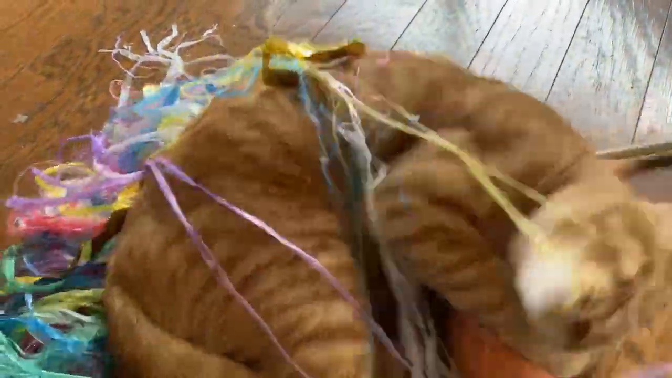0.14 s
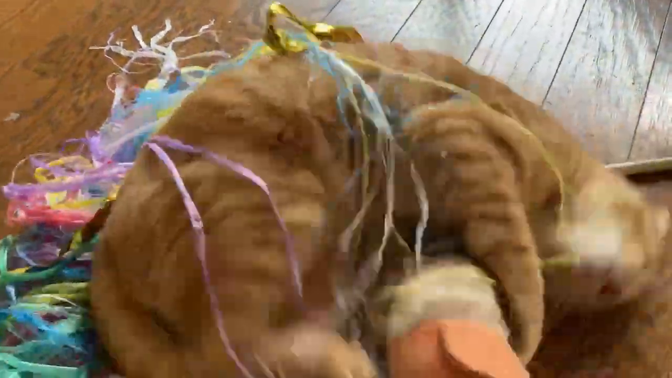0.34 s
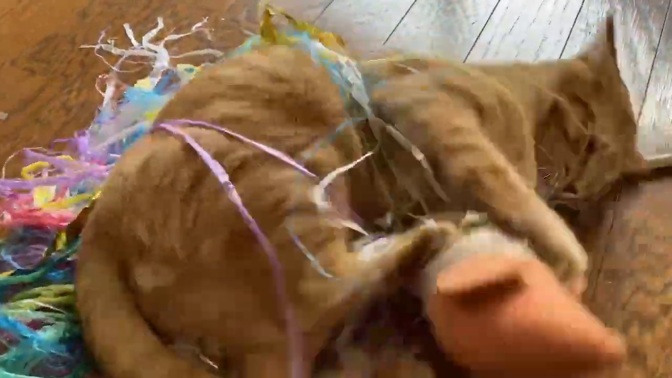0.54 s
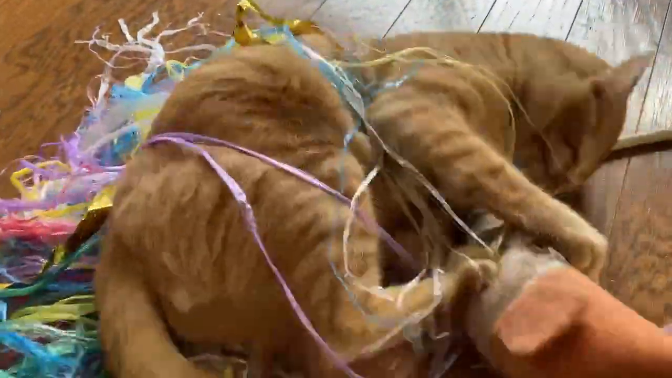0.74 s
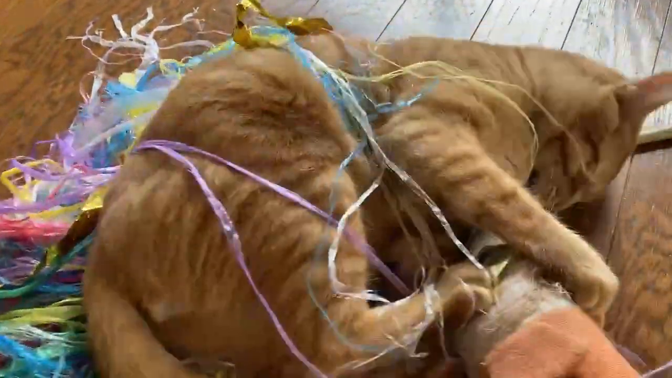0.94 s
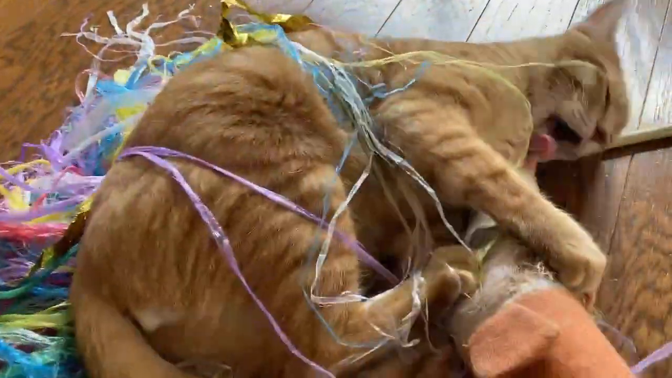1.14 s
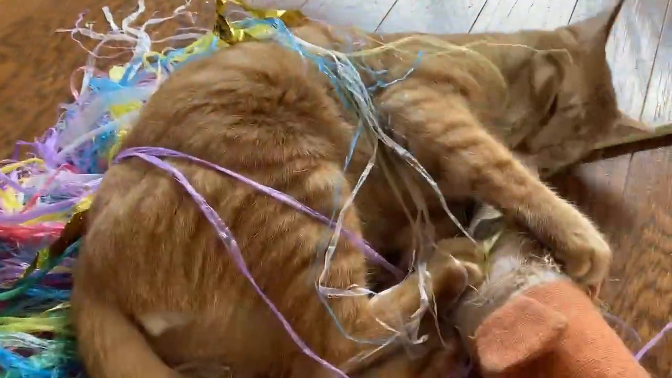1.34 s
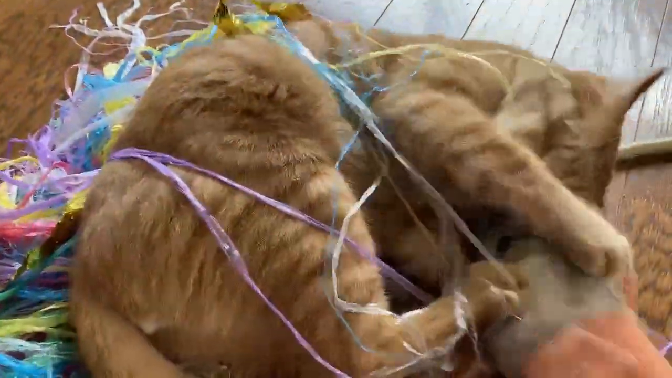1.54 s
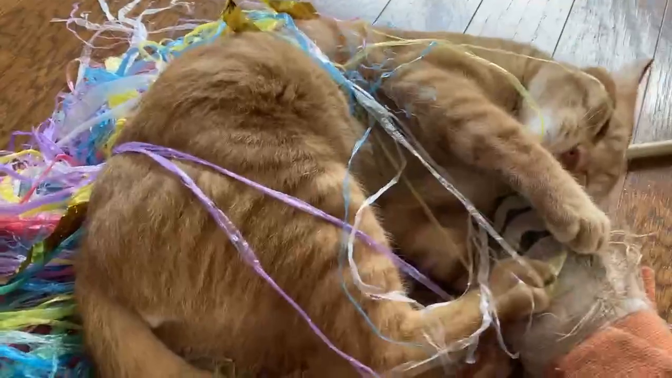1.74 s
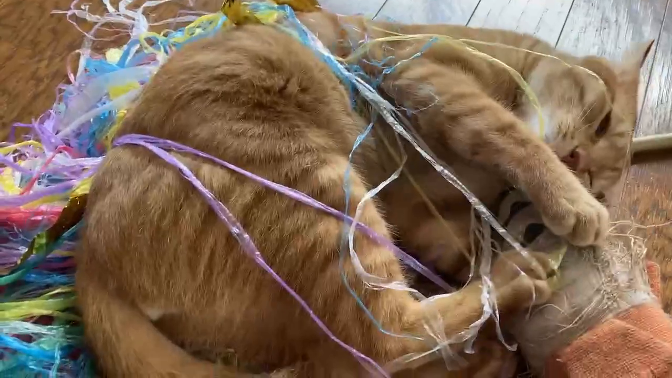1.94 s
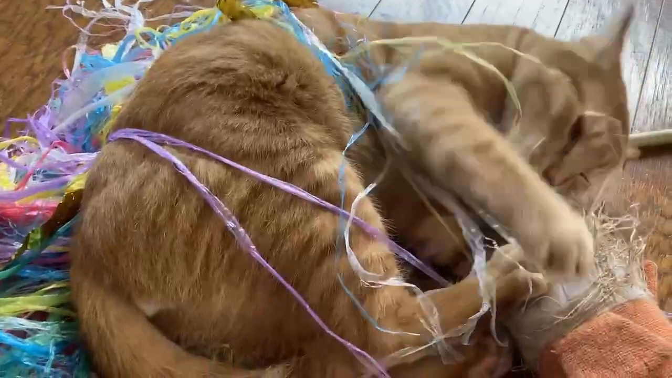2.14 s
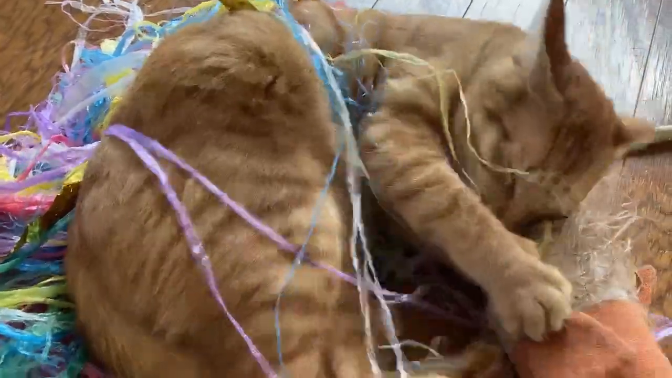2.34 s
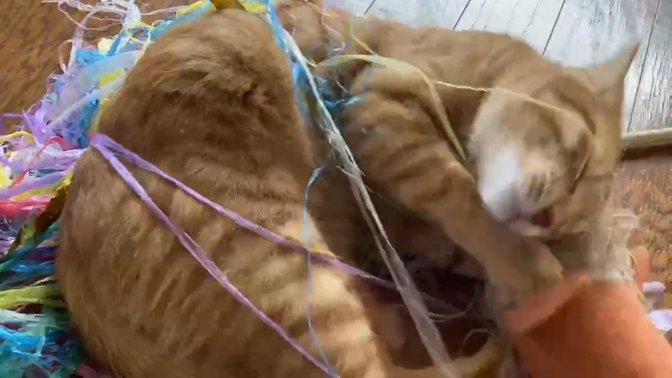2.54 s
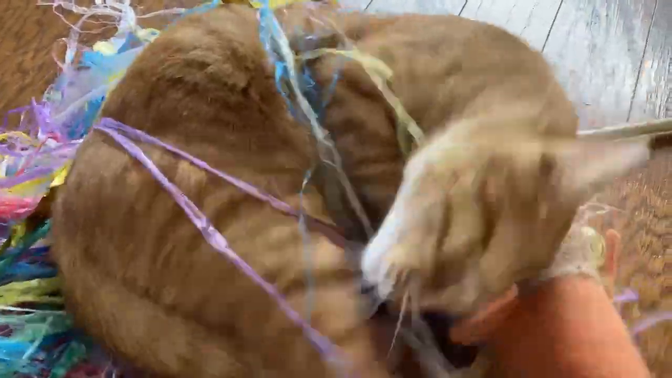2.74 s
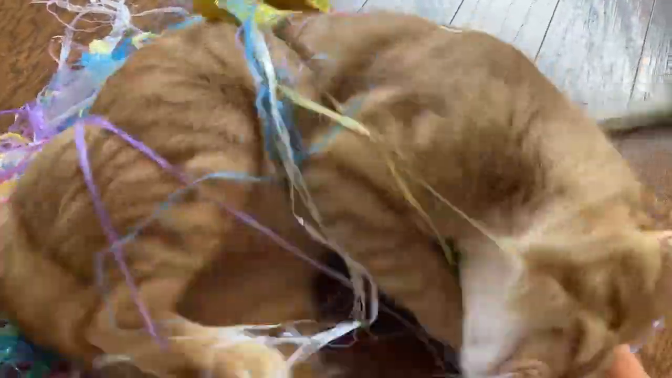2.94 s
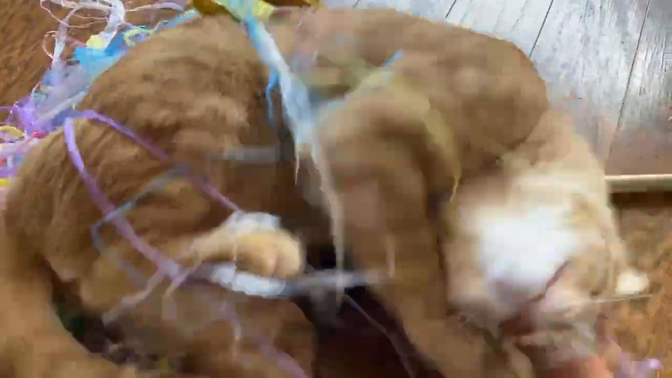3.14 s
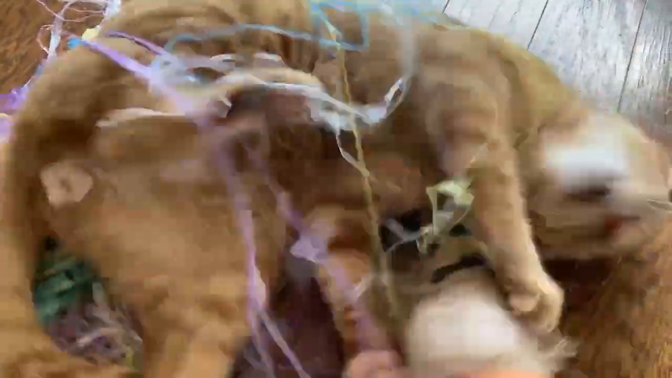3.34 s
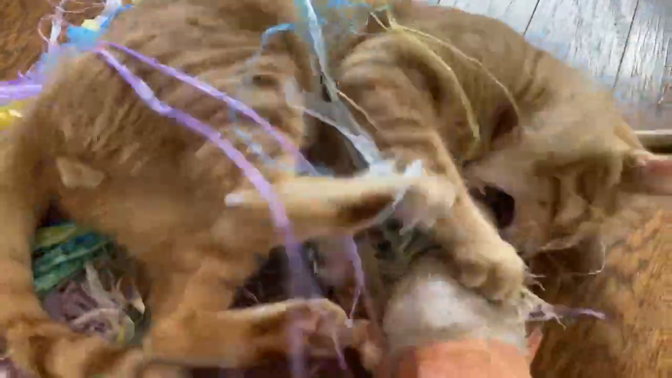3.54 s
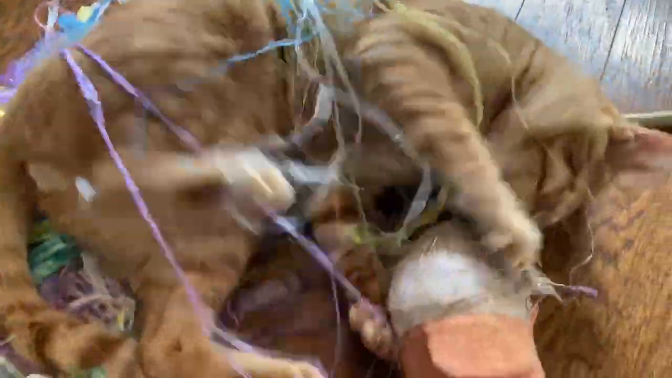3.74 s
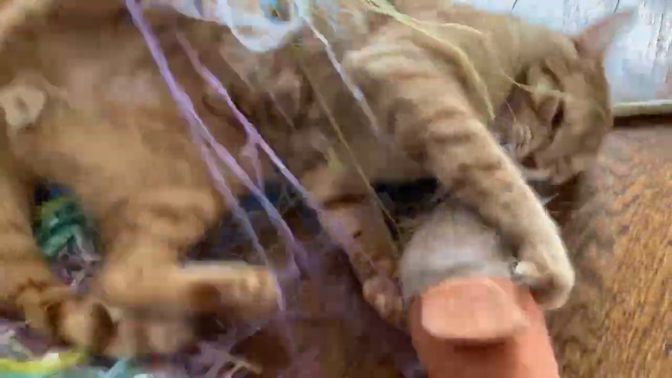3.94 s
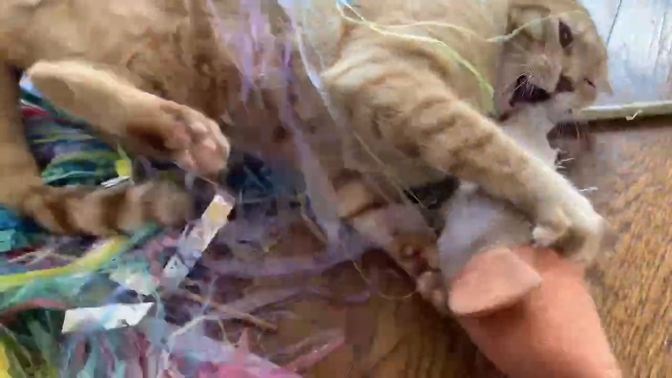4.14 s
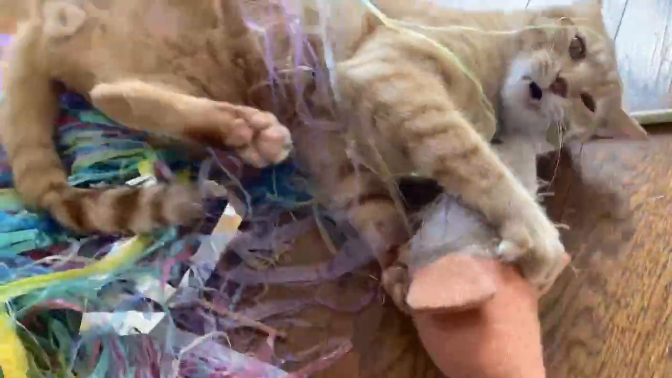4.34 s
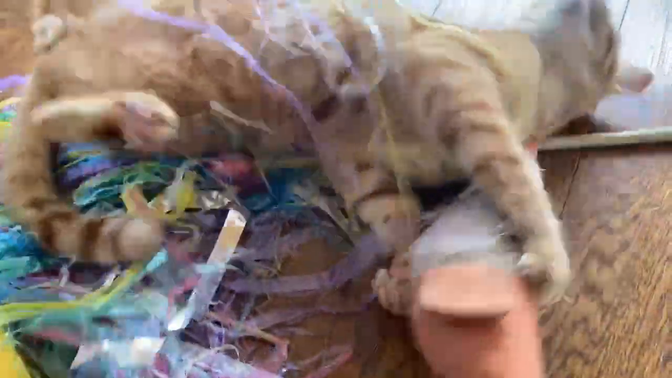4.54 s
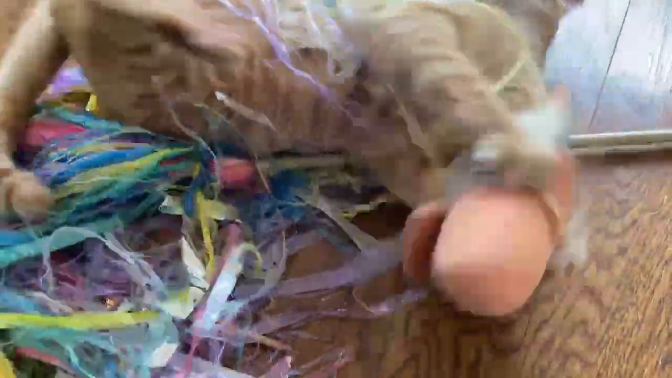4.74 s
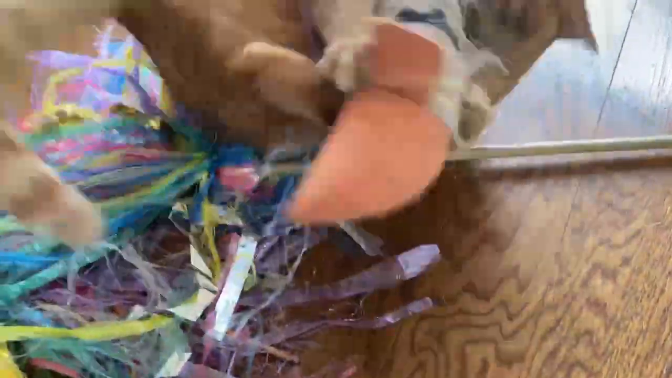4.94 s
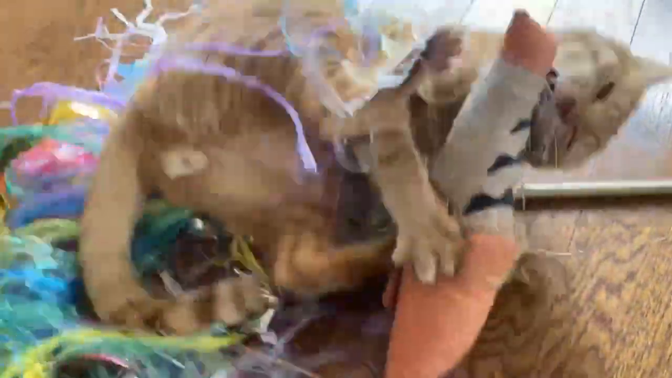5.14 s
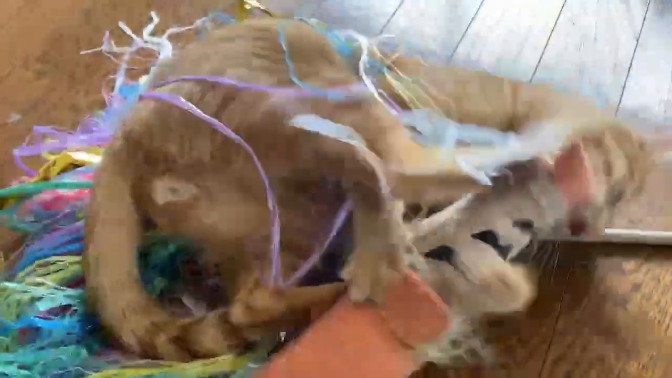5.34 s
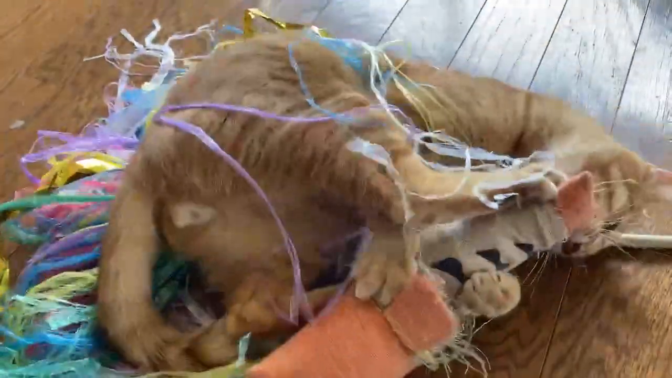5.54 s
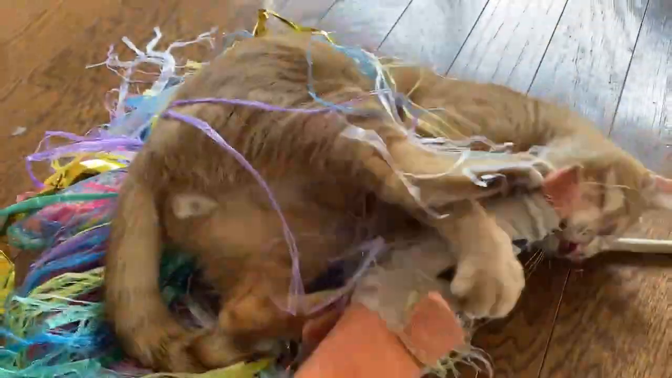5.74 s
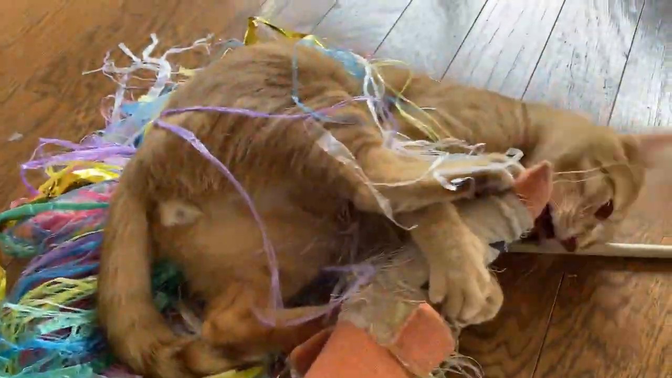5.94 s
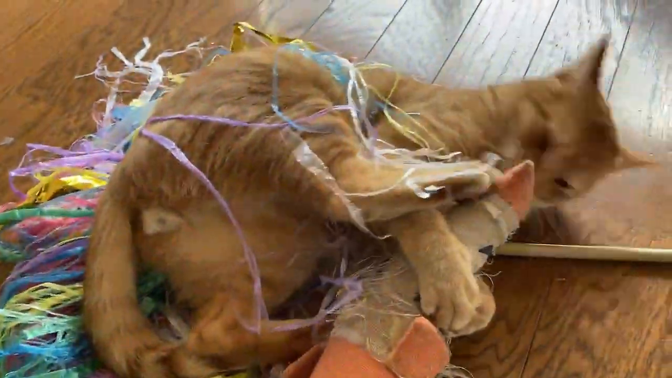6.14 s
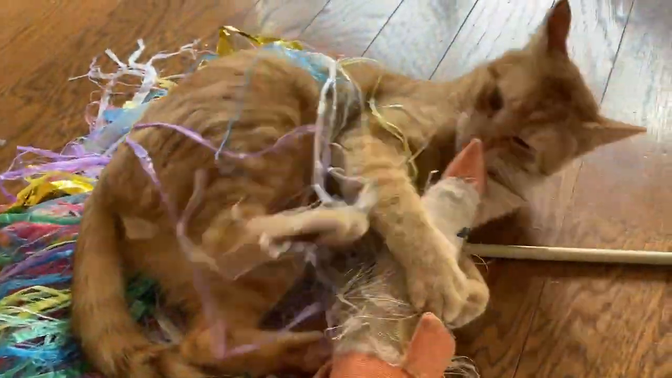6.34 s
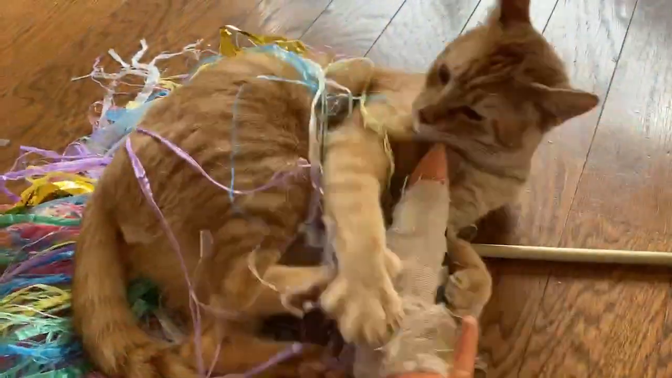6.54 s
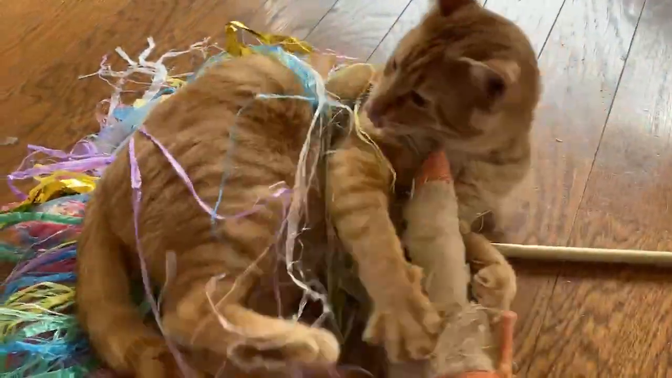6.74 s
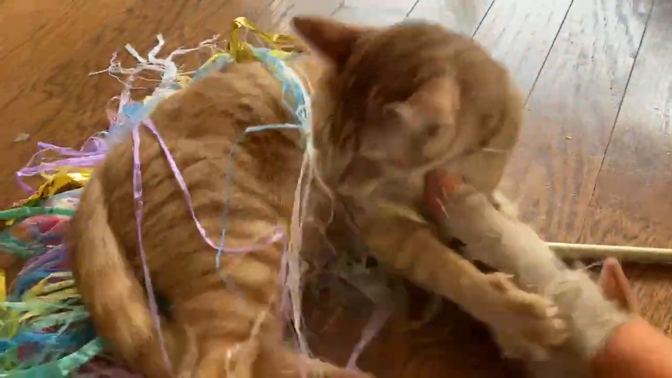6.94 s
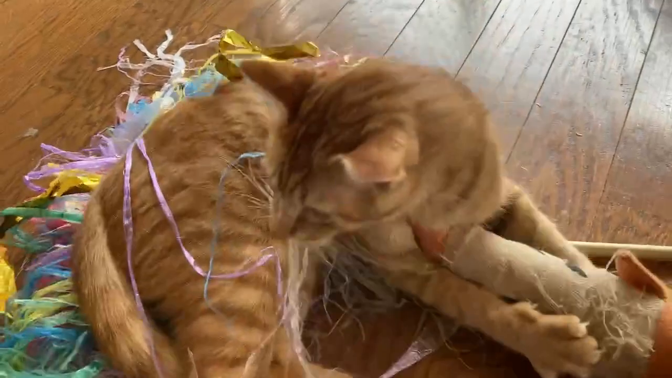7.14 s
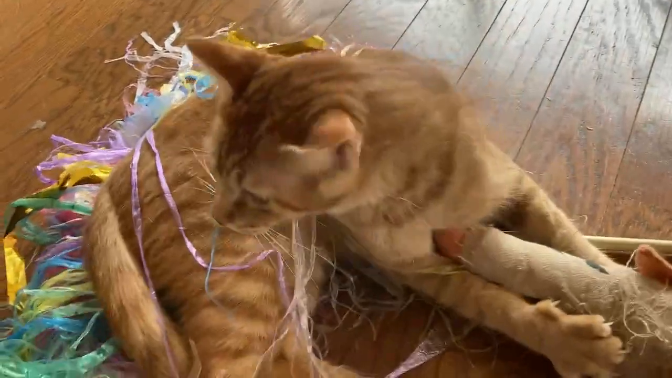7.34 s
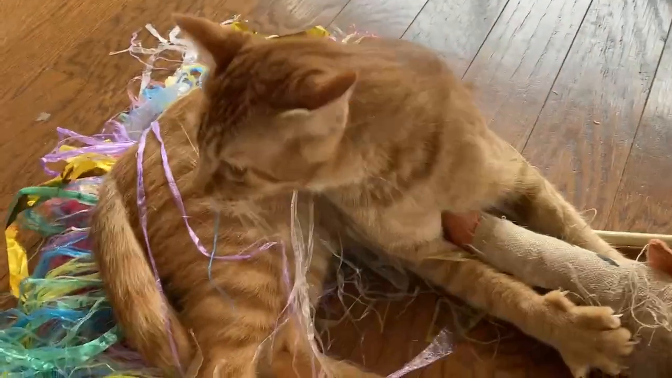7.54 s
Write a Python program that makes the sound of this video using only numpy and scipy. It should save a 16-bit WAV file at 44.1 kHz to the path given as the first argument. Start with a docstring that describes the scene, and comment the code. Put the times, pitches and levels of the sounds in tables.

```python
"""Cat wrestling a toy in plastic ribbon

A cat wrestles a cloth toy in a heap of thin plastic ribbon on a wooden floor, close to a phone.
Clumped clicks make the ribbon crackle, noise bursts its snaps, and banded grains the fur and cloth scuffs.
Decaying modes jingle a small bell, chatter rings a dragged hollow wand, falling waves give knocks and thumps.
A low rumble lies beneath; two microphone ports comb the treble against each other."""
import sys
import numpy as np
from scipy import signal
from scipy.fft import rfft, irfft, next_fast_len
from scipy.io import wavfile
from scipy.ndimage import uniform_filter1d

SR = 44100
rng = np.random.default_rng(int(sys.argv[2]) if len(sys.argv) > 2 else 0)


def digitize_waveform(pressure):
    """Quantize a signal to 16-bit integers and store it at the path in sys.argv[1].

    Rows of a 2-D input are taken as channels; values are limited to [-1, 1].
    """
    field = np.atleast_2d(pressure).T
    bounded = np.clip(field, -1, 1)
    quanta = np.round(bounded * 32767).astype(np.int16)
    wavfile.write(sys.argv[1], SR, quanta)


def makeup_ratio(level_db):
    """Linear amplitude ratio for a level in decibels (20 dB per factor of ten)."""
    decades = np.asarray(level_db, float) / 20
    return 10 ** decades


N = 338688
T = np.arange(N) / SR

# Tugs at the ribbon. Each row: peak time, rise and fall in seconds, level in dB.
RIBBON_TUGS = [(0.075, 0.058, 0.55, -48), (0.24, 0.186, 0.065, -33.5), (0.334, 0.187, 0.157, -43.5),
               (0.63, 0.19, 0.44, -47), (1.098, 0.46, 1, -60), (1.56, 0.498, 0.95, -50),
               (2.04, 0.087, 0.092, -67), (2.27, 0.147, 0.49, -51.5), (2.527, 0.166, 0.193, -43),
               (2.928, 0.352, 0.34, -42), (3.038, 0.28, 0.059, -46), (3.173, 0.093, 0.57, -41),
               (3.377, 0.082, 0.106, -37), (4.066, 0.64, 0.386, -42), (5.1, 0.153, 0.118, -36),
               (5.34, 0.29, 0.168, -36.5), (5.662, 0.65, 0.204, -53), (5.817, 0.13, 0.056, -49.5),
               (5.927, 0.16, 0.046, -59), (6.186, 0.207, 0.23, -48), (6.575, 0.45, 0.27, -55.5),
               (6.914, 0.31, 0.98, -58.5), (7.164, 1, 0.083, -50)]
# The restless heap. Each row: time in seconds, ribbon stir in dB, fur rub in dB.
HEAP_STIR = [(0, -52.5, -92.5), (0.45, -49.5, -75), (0.8, -53, -74.5), (1.35, -71.5, -81.5),
             (1.8, -71.5, -69), (1.98, -101, -75), (2.2, -60, -75.5), (2.38, -60.5, -72),
             (2.66, -54.5, -103), (2.8, -51, -71.5), (3.3, -46.5, -80.5), (3.62, -54.5, -84),
             (3.95, -51, -67.5), (4.32, -52, -74.5), (4.9, -46.5, -91.5), (5.2, -44.5, -78.5),
             (5.5, -59.5, -81.5), (5.98, -61.5, -74), (6.4, -69.5, -72), (6.7, -59.5, -66),
             (7.1, -63.5, -79), (7.36, -59.5, -70), (7.68, -68, -73.5)]
# Crackle spectrum. Each row: frequency in Hz, density in dB per Hz (only its shape counts).
RIBBON_COLOUR = [(3000, -57), (7500, -27), (8200, 7), (11000, 7.5), (13000, 3), (15500, 2.5),
                 (17000, -59.5)]
# Ribbon folds that snap. Each row: start in seconds, treble level in dB,
# depth in dB (lower registers against the treble, before scaling).
FOLD_SNAPS = [(0.1789, -22, -28.5), (0.2342, -21.5, -27), (0.2567, -15.5, -32.5), (0.3242, -28, -25),
              (0.4222, -34, -13), (0.444, -32.5, -18), (0.687, -35, -29.5), (0.8507, -31.5, -19),
              (1.04, -38.5, -10.5), (1.0913, -34.5, -21), (1.1201, -35.5, -9.5), (2.2310, -20.5, -4),
              (2.2330, -29, -7.5), (2.2383, -26.5, -2), (2.2401, -21, -1.5), (2.2968, -44.5, 11),
              (2.4123, -37, -14), (2.428, -24.5, 3.5), (2.4495, -33, -5), (2.4718, -28, -2.5),
              (2.4764, -28.5, -13), (2.4837, -33.5, -12), (2.491, -28.5, -12.5), (2.5041, -34, -15),
              (2.5156, -28, -17), (2.5266, -27.5, -3), (2.5326, -16, -11.5), (2.5445, -25, -11),
              (2.6205, -28.5, -1.5), (2.971, -28.5, -23.5), (3.033, -26, -32.5), (3.0446, -25, -29),
              (3.1563, -26, -30), (3.1691, -27, -42), (3.1885, -23.5, -31.5), (3.2204, -19.5, -33.5),
              (3.365, -18.5, -44.5), (3.3839, -25.5, -43.5), (3.644, -37, -26.5), (4.4474, -25, -19),
              (4.544, -44, 3.5), (4.574, -35.5, -4), (4.5883, -35, -2.5), (4.652, -35.5, 3),
              (4.7592, -45, -7.5), (4.781, -26, -14), (4.8402, -25.5, -0.5), (4.9359, -22.5, -14),
              (5.017, -28.5, -31), (5.0548, -23.5, -40), (5.0869, -25.5, -33.5), (5.228, -25.5, -45),
              (5.2613, -19, -36.5), (5.5047, -36, -32.5), (5.646, -28, -33.5), (5.694, -31, -50.5),
              (5.7686, -32.5, -21), (5.8054, -32, -27.5), (5.8245, -33.5, -15), (5.926, -32.5, -18),
              (6.1447, -36.5, -7.5), (6.151, -39, 3), (6.8275, -34, -7.5), (7.3091, -40.5, 1.5),
              (7.5937, -41.5, -18)]
# Strokes of fur and cloth. Each row: peak time, rise and fall in seconds, level in dB, darkness in dB.
FUR_STROKES = [(0.06, 0.214, 0.114, -51.5, -1), (0.225, 0.1164, 0.128, -53.5, 6),
               (0.334, 0.15, 0.106, -68, 4.5), (0.634, .07, 0.4, -66.5, -9), (1.098, 0.274, 0.3, -58.5, 2),
               (1.52, 0.735, 0.303, -59, 1), (2.04, 0.072, 0.097, -61.5, 1),
               (2.236, 0.0825, 0.216, -51, -2), (2.525, 0.172, 0.16, -48.5, -9),
               (2.661, 0.414, 0.0612, -52, 1), (2.859, 0.13, 0.125, -56.5, 8), (3.03, 0.5, 0.12, -59, 3.5),
               (3.173, 0.24, 0.46, -68, -5.5), (3.459, 0.0205, 0.095, -54, 8.5),
               (3.505, 0.098, 0.0244, -57, 2.5), (3.845, 0.02, 1, -60, -5.5), (4.0, 0.206, 0.4, -56, -14),
               (4.066, 0.093, 0.087, -48.5, 3), (4.13, 0.173, 0.147, -62.5, 9), (4.6, 0.275, 0.89, -55, -3),
               (4.769, 0.4, 0.21, -53, -11), (4.944, 0.243, 0.107, -47, -4),
               (4.99, 0.2, 0.053, -56.5, -4.5), (5.109, 0.041, 0.126, -65, 6.5),
               (5.365, 0.046, 0.145, -61.5, 7.5), (5.817, 0.073, 0.026, -67.5, 0),
               (6.174, 0.0695, 0.211, -54.5, -1.5), (6.914, 0.354, 0.516, -59.5, -1),
               (7.054, 0.38, 0.66, -65, -17.5), (7.155, 0.045, 0.312, -58, 3),
               (7.41, 0.036, 0.44, -62.5, -2), (7.54, 0.235, 0.161, -68, 12)]
# Registers of the rub. Each row: centre in Hz, tint in dB.
SCUFF_BANDS = [(330, -12), (470, -8), (680, -8), (980, -6), (1400, -8.5), (2000, -6.5), (2900, -8.5),
               (4200, -4), (5600, -13.5), (7000, -0.5)]
# Claws and wand on the boards. Each row: start in seconds, level in dB, pitch in Hz, brightness in dB.
BOARD_KNOCKS = [(0.425, -37.5, 590, -11), (0.621, -41, 2970, -2), (0.869, -43.5, 662, -12.5),
                (0.935, -43, 567, -19), (1.101, -42.5, 1270, -6), (1.222, -43, 1580, 7),
                (1.253, -41.5, 956, -14.5), (1.442, -33.5, 795, -12), (1.555, -29.5, 1600, -9),
                (2.667, -27.5, 898, -11.5), (2.773, -37.5, 690, -25), (2.841, -39, 1860, -7),
                (3.085, -37.5, 798, -26.5), (3.451, -27, 1078, -13.5), (3.659, -48, 1335, -24),
                (3.838, -50.5, 1820, 3), (4.009, -28.5, 1350, -1), (4.055, -11.5, 1854, -36),
                (4.061, -20.5, 806, -5), (4.072, -29, 830, -7.5), (4.158, -41.5, 1900, -0.5),
                (4.619, -36.5, 1515, -2), (4.793, -36, 1624, -15), (4.864, -21, 1610, -12.5),
                (4.874, -33, 1920, -4), (4.936, -32.5, 1566, -10), (4.949, -33, 2560, 5),
                (5.359, -44.5, 557, -7), (5.370, -37, 1690, -16.5), (5.626, -49.5, 1014, -27),
                (5.765, -47, 717, -4), (5.828, -74.5, 466, 25.5), (6.177, -29.5, 1578, -17),
                (6.226, -34, 2400, -3.5), (6.54, -38.5, 1070, -24.5), (6.608, -36, 2030, -28),
                (6.856, -36.5, 2400, -22.5), (6.928, -35.5, 1840, -1), (7.078, -43.5, 940, -14.5),
                (7.143, -37, 1200, -15)]
# Woody tail of a knock. Each row: centre in Hz, width in Hz, level in dB.
BOARD_TAIL = [(723, 347, 0), (1036, 350, -1.5), (2106, 1260, 0)]
# Body weight landing. Each row: start in seconds, level in dB, pitch in Hz.
BODY_THUMPS = [(0.04, -54.5, 158), (0.197, -52.5, 240.3), (0.431, -57, 87.6), (1.045, -46.5, 269),
               (1.526, -53.5, 166), (2.041, -45.5, 258.6), (2.519, -55, 117), (2.634, -51.5, 165.7),
               (3.314, -48, 92.5), (3.447, -47.5, 275), (5.001, -39, 117.2), (5.096, -53.5, 89),
               (5.129, -54, 85.3), (6.867, -52, 115), (7.519, -51, 165)]
# Pellet strikes on the bell. Each row: start in seconds, low, middle and top mode levels in dB,
# free ring in seconds.
PELLET_STRIKES = [(0.0044, -51, -46, -59.5, 0.047), (0.331, -62, -53.5, -44, 0.043),
                  (0.4222, -74.5, -77, -35.5, 0.036), (0.4463, -57.5, -53, -41.5, 0.143),
                  (0.611, -61, -59, -46, 0.064), (0.686, -46, -48, -35, 0.0172),
                  (1.7701, -56, -52, -71, 0.113), (2.379, -48.5, -53.5, -75, 0.047),
                  (2.6484, -49, -70, -63.5, 0.041), (3.4032, -60, -59.5, -39, 0.058),
                  (3.4536, -36, -36.5, -40, 0.0223), (3.487, -46, -47.5, -58.5, 0.0338),
                  (4.724, -40.5, -58.5, -45.5, 0.067), (4.7578, -39, -41.5, -52.5, 0.087),
                  (4.825, -41, -50.5, -56, 0.093), (4.89, -44, -42.5, -63.5, 0.049),
                  (4.949, -44, -51.5, -41.5, 0.032), (4.9714, -52, -41, -59.5, 0.035),
                  (4.9785, -34.5, -37, -40.5, 0.025), (4.9953, -47.5, -43.5, -38.5, 0.0315),
                  (5.037, -56.5, -58, -44, 0.062), (6.774, -60.5, -73.5, -73.5, 0.028),
                  (6.984, -51.5, -50.5, -54, 0.0103), (6.995, -45, -43.5, -51.5, 0.0085),
                  (7.060, -44.5, -45, -51.5, 0.025), (7.074, -43.5, -55.5, -56.5, 0.135)]
# Bell modes. Each row: frequency in Hz, level in dB, 60 dB decay in seconds, strike level that drives it.
BELL_MODES = [(5035, -9, .2, 0), (5292, -6, .2, 0), (5313, -3, .25, 0), (5916, 0, .15, 1),
              (6480, -14, .12, 1), (7290, -18, .12, 1), (12595, 0, .2, 2)]
# Wand drags. Each row: peak time, rise and fall in seconds, level in dB, pitch in Hz, overtones in dB.
WAND_DRAGS = [(0.053, 0.0224, 0.043, -39, 902.5, -12), (0.076, 0.02, 0.032, -44.5, 889.5, -8.5),
              (0.097, 0.029, 0.096, -47.5, 883, -15), (0.2, 0.019, 0.049, -54.5, 867, 1),
              (0.23, 0.044, 0.068, -59.5, 868, 2), (0.71, 0.095, 0.087, -68, 881.4, -10),
              (1.539, 0.0288, 0.0515, -44, 896, -10.5), (2.906, 0.02, 0.024, -53.5, 888, -15),
              (2.84, 0.046, 0.246, -54.5, 1029, -5), (2.865, 0.063, 0.128, -51, 883, -7),
              (3.0, .14, 0.133, -63, 957, 6), (3.021, 0.062, 0.236, -50.5, 865.5, -14.5)]
# Wand resonances. Each row: multiple of the pitch, half width in Hz, level in dB.
WAND_MODES = [(1, 42, 0), (1.98, 80, 0), (2.65, 70, -4)]
# Weight on the floor. Each row: time in seconds, rumble level in dB.
FLOOR_WEIGHT = [(0.0, -68), (0.79, -74.5), (1.56, -58), (1.65, -72.5), (2.57, -63), (3.27, -71.5),
                (3.31, -69), (3.72, -75.5), (4.04, -64), (4.28, -77), (4.6, -68), (4.96, -63),
                (5.06, -70.5), (5.26, -75.5), (7.68, -65.5)]
# Rumble spectrum. Each row: frequency in Hz, density in dB per Hz (only its shape counts).
RUMBLE_COLOUR = [(15, -28), (25, -22), (64, 0), (87, -1), (118, 3.5), (176, -1.5), (209, -4.5),
                 (400, -11.5), (520, -44.5), (880, -120)]
# Early reflections, unlike at the two ports. Each row: frequency in Hz, dB against the direct sound.
REFLECTION_COLOUR = [(100, -32.5), (400, -34), (700, -20), (1300, -2), (2500, -2), (5500, 2.5),
                     (6500, -0.5), (7500, -16), (8800, -14), (16000, -33)]
# Phase by which the left port leads the right. Each row: frequency in Hz, lead in half turns.
PORT_LEAD = [(0, 0), (7000, 0), (15900, -4), (20000, -5.8)]

# scuff registers against the middle one; edge dB per dB of darkness
BODY_DB, EDGE_DB, EDGE_PER_DARK = -2.5, -2, -0.657
# dB lost after the rise or fall time; curve 1 = pointed peak, 2 = round
SWELL_DB, SWELL_CURVE = 30.5, 1.058


def unit(x):
    """Scale to rms 1."""
    return x / np.sqrt(np.mean(x ** 2))


def colour(x, points, size=2048):
    """Causal filter through (Hz, dB) points, from the cepstrum of the log gain."""
    hz, db = np.transpose(points)
    f = np.maximum(np.fft.rfftfreq(size, 1 / SR), 1)
    log_gain = np.interp(np.log(f), np.log(hz), db) * np.log(10) / 20
    cepstrum = irfft(log_gain)
    # folding the cepstrum forward gives minimum phase
    cepstrum[1:size // 2] *= 2
    cepstrum[size // 2 + 1:] = 0
    return signal.fftconvolve(x, irfft(np.exp(rfft(cepstrum))))[:N]


def band(x, lo_hz, hi_hz):
    """Band-pass between two frequencies."""
    edges = [lo_hz, min(hi_hz, .45 * SR)]
    return signal.sosfilt(signal.butter(2, edges, "bandpass", fs=SR, output="sos"), x)


def walk(rate):
    """Random levels, rate per second, joined by straight slopes; spread a little under 1."""
    k = int(SR / rate)
    steps = np.repeat(rng.standard_normal(N // k + 1), k)
    return 1.0595 * uniform_filter1d(steps, k)[:N]


def grains(per_s, spread_db, hiss_db):
    """Scattered clicks at rms 1, many small and a few large, over a steady hiss."""
    strike, rank, sign = rng.random((3, N))
    size = makeup_ratio(spread_db * np.minimum(-np.log(rank + 1e-9), 3.1)) * np.sign(sign - .5)
    clicks = unit((strike < per_s / SR) * size)
    return clicks + makeup_ratio(hiss_db) * rng.standard_normal(N)


def add(out, s, shape):
    """Mix a short sound in at s seconds."""
    i = max(int(s * SR), 0)
    out[i:i + len(shape)] += shape[:N - i]


def swells(rows):
    """Shape in dB of each movement: up to its peak over the rise time, away over the fall time."""
    s, rise_s, fall_s, db = np.array(rows)[:, :4].T[:, :, None]
    t = T[::64]
    distance = np.where(t < s, (s - t) / abs(rise_s), (t - s) / abs(fall_s))
    return db - SWELL_DB * distance ** SWELL_CURVE


def summed(shapes_db, rest_db):
    """Movements and the resting level add in power; dB per sample."""
    power = np.sum(makeup_ratio(shapes_db) ** 2, axis=0) + makeup_ratio(rest_db[::64]) ** 2
    return np.interp(T, T[::64], 10 * np.log10(power))


def ribbon(db):
    """Strips slide and buckle: dense crackle in quick clumps."""
    clumps = makeup_ratio(2.0 * walk(60) + 1.105 * walk(24))
    crackle = grains(per_s=900, spread_db=6.5, hiss_db=1.5) * clumps
    return makeup_ratio(db) * unit(colour(crackle, RIBBON_COLOUR))


def snaps():
    """Each fold pops in about a millisecond and leaves a short hiss; deep folds are duller on top."""
    out, t = np.zeros(N), np.arange(SR // 25) / SR
    burst = np.exp(-((t - .001) / 0.000398) ** 2)
    hiss = makeup_ratio(-11) * np.exp(-t / 0.00325) * np.minimum(t / 0.00282, 1)
    for s, top_db, deep_db in FOLD_SNAPS:
        pop = rng.standard_normal(len(t)) * (burst + hiss)
        # the treble tilts above 9 kHz according to depth
        tilt_db = 0.299 * (deep_db + 38.5)
        dull = [(hz, db - tilt_db * max(np.log2(hz / 9000), 0)) for hz, db in RIBBON_COLOUR]
        top = colour(pop, dull, size=512)[:len(t)]
        low, mid = band(pop, 6130, 7260), band(pop, 1870, 3665)
        parts = (top, 4.5), (low, 0.823 * deep_db), (mid, 0.817 * deep_db - 7.5)
        add(out, s, sum(makeup_ratio(top_db + db) * v / abs(v).max() for v, db in parts))
    return out


def scuff(mid_db, body_db, edge_db):
    """Fur and cloth rub wood: slips of the whole contact, plus threads that catch in one register only."""
    slips, grip = grains(per_s=450, spread_db=4.5, hiss_db=-0.5), makeup_ratio(2.675 * walk(40))
    weight_db = np.interp(T, *np.transpose(FLOOR_WEIGHT))
    out = 0
    for k, (hz, tint_db) in enumerate(SCUFF_BANDS):
        # body fades out up to 2400 Hz, edge fades in from 4300 Hz, the middle register fills the rest
        body = np.clip(np.log2(2400 / hz) / 1.47, 0, 1)
        edge = np.clip(np.log2(hz / 4300) / 0.87, 0, 1)
        db = body * body_db + edge * edge_db + (1 - body - edge) * mid_db + tint_db
        # the lowest rub depends partly on how much weight rests on the boards
        weight_share = np.clip(np.log2(800 / hz) / 4.7, 0, 1)
        db = db + weight_share * (weight_db - body_db)
        threads = makeup_ratio(2.0) * grains(per_s=120, spread_db=4.5, hiss_db=0)
        rub = unit(band(grip * (slips + threads), hz / 1.141, hz * 1.1953))
        flicker_db = 1.784 * walk(35) + 2.48 * walk(9)
        # neighbouring bands alternate in sign
        out = out + (-1) ** k * makeup_ratio(db + flicker_db) * rub
    return out


def board_wave(hz, turns, start, end):
    """A bending wave in a board: high pitch arrives first, so the blow slides down through hz."""
    t = np.arange(int(4 * turns * SR / hz)) / SR * hz  # in periods of hz
    pitch = end + start * np.exp(-t / (turns / 2))
    swell = (t / turns) ** .5 * np.exp(-1.6 * t / turns)
    wave = np.sin(2 * np.pi * np.cumsum(pitch) * hz / SR) * swell
    return wave / abs(wave).max()


def knocks():
    """Claws and wand hit the boards: a sliding board wave, a bright tick and a short woody tail."""
    out, t = np.zeros(N), np.arange(SR // 20) / SR
    for s, db, hz, bright_db in BOARD_KNOCKS:
        z = rng.standard_normal(len(t))
        add(out, s, makeup_ratio(db - 12.0) * board_wave(hz, turns=2.944, start=1.648, end=0.3623))
        tick = band(z * t * np.exp(-t / 0.000405), 1900, 4900)
        wood = z * np.exp(-t / 0.00676)
        tail = sum(makeup_ratio(d) * band(wood, f - w / 2, f + w / 2) for f, w, d in BOARD_TAIL)
        add(out, s, makeup_ratio(db + bright_db) * tick / abs(tick).max())
        add(out, s, makeup_ratio(db - 14.0) * tail / abs(tail).max())
    return out


def thumps():
    """Body weight lands softly: a low board wave mixed with a blurred bump of noise."""
    out, t = np.zeros(N), np.arange(SR // 20) / SR
    bump = np.sin(np.pi * t / t[-1]) * np.exp(-t / 0.0243)
    for s, db, hz in BODY_THUMPS:
        thud = band(rng.standard_normal(len(t)) * bump, hz / 1.128, hz * 1.263)
        # low thumps ring the board cleanly, high ones are more of a blurred bump of fur
        blur_db = 9 * np.log2(hz / 170)
        add(out, s, makeup_ratio(db - max(blur_db, 0)) * board_wave(hz, turns=1.906, start=1.5, end=0.489))
        add(out, s, makeup_ratio(db - 2.0 + min(blur_db, 0)) * thud / abs(thud).max())
    return out


def bell():
    """Every strike rings the same modes; the loose pellet roughens the ring until fur muffles it."""
    out, t = np.zeros(N), np.arange(SR // 5) / SR
    # level and phase wobble per mode, doubled in length so late strikes never run out
    rattle = [np.tile(makeup_ratio(4 * walk(170)) * np.exp(1.1j * walk(170)), 2) for _ in BELL_MODES]
    for s, *strike_db, ring_s in PELLET_STRIKES:
        muffle = makeup_ratio(-34.5) + 1 / (1 + np.exp((t - ring_s) / 0.0075))
        free = np.minimum(t / 0.00085, 1) * muffle
        for (hz, db, t60, k), rough in zip(BELL_MODES, rattle):
            ring = np.exp((2j * np.pi * hz - np.log(1000) / t60) * t)
            tone = ring * rough[int(s * SR):][:len(t)]
            add(out, s, makeup_ratio(db + strike_db[int(k)]) * free * tone.imag)
    return out


def wand():
    """Chatter against the floor rings the hollow wand; grip and angle shift its pitch from drag to drag."""
    out, span = np.zeros(N), SR // 2
    chatter = grains(per_s=420, spread_db=4.0, hiss_db=-1.5)
    for (s, _, _, _, hz, over_db), shape_db in zip(WAND_DRAGS, swells(WAND_DRAGS)):
        part = slice(max(int(s * SR) - span, 0), int(s * SR) + span)
        tone = 0
        for k, half_hz, db in WAND_MODES:
            mode = unit(band(chatter[part], k * hz - half_hz, k * hz + half_hz))
            tone = tone + makeup_ratio(db + over_db * (k > 1)) * mode
        out[part] += tone * makeup_ratio(np.interp(T[part], T[::64], shape_db))
    return out


def rumble():
    """Low murmur of the house and of weight shifting on the boards: coloured noise that wavers."""
    db = np.interp(T, *np.transpose(FLOOR_WEIGHT))
    murmur = unit(colour(rng.standard_normal(N), RUMBLE_COLOUR, size=8192))
    return makeup_ratio(db + 3.52 * walk(16)) * murmur


def reflections(near):
    """Two short decaying echo patterns, blended in a randomly wandering mix, for a diffuse stereo spread."""
    t = np.arange(SR // 20) / SR
    echoes = rng.standard_normal((2, len(t))) * np.exp(-t / 0.00097)
    a, b = (signal.fftconvolve(near, e / np.sqrt(np.sum(e ** 2)))[:N] for e in echoes)
    turn = 2.91 * walk(19)  # radians
    return colour(a * np.cos(turn) + b * np.sin(turn), REFLECTION_COLOUR)


def scene():
    """All sources near the phone, plus a few milliseconds of reflections that differ left and right."""
    s, *rest = np.transpose(HEAP_STIR)
    stir_db, rub_db = (np.interp(T, s, c) for c in rest)
    rustle_db = summed(swells(RIBBON_TUGS), stir_db)
    strokes, dark_db = swells(FUR_STROKES), np.array(FUR_STROKES)[:, -1:]
    # darkness lifts the body of a stroke and lowers its edge
    mid_db = summed(strokes, rub_db)
    body_db = summed(strokes + dark_db + BODY_DB, rub_db + 0.5)
    edge_db = summed(strokes + EDGE_PER_DARK * dark_db + EDGE_DB, rub_db + 2)
    near = ribbon(rustle_db) + snaps() + scuff(mid_db, body_db, edge_db)
    near = near + knocks() + thumps() + bell() + wand() + rumble()
    side = reflections(near)
    return np.array([near + side, near - side])


def band_limit(x):
    """A steep low-pass at the top of the band."""
    return signal.sosfilt(signal.butter(12, 16980, fs=SR, output="sos"), x)


def record(dry):
    """The ports lie a few centimetres apart, so the treble reaches them out of step."""
    size = next_fast_len(N + SR // 10)
    hz, lead = np.transpose(PORT_LEAD)
    lead = np.interp(np.fft.rfftfreq(size, 1 / SR), hz, lead)
    # bend the phase curve flatter near whole half turns, for wider treble notches
    phase = np.pi * lead - .6 * np.sin(2 * np.pi * lead)
    half = np.exp(.5j * phase)  # each port takes half of the difference
    mix = irfft(rfft(dry, size) * np.array([half, half.conj()]), size)[:, :N]
    return band_limit(mix)


dry = scene()
out = record(dry)
digitize_waveform(out)
```